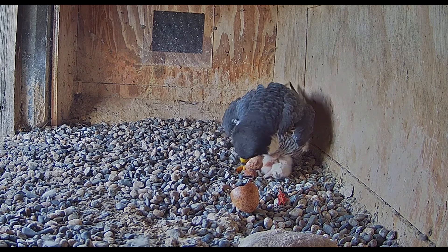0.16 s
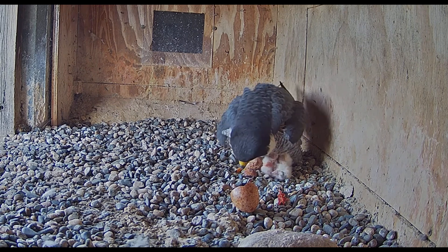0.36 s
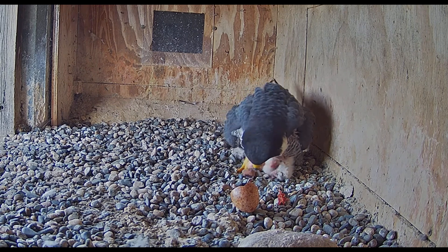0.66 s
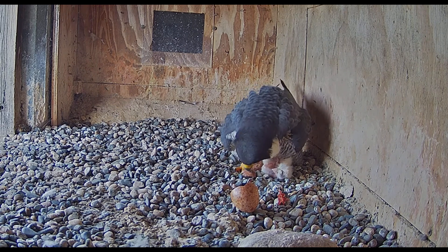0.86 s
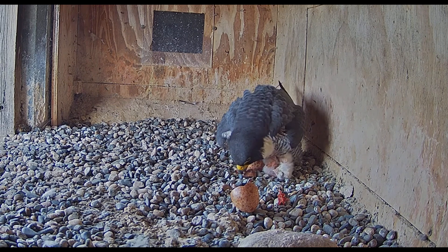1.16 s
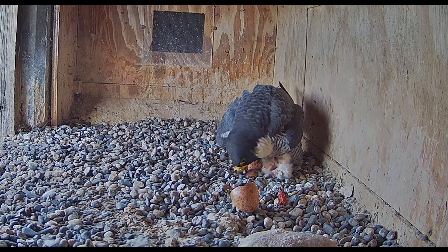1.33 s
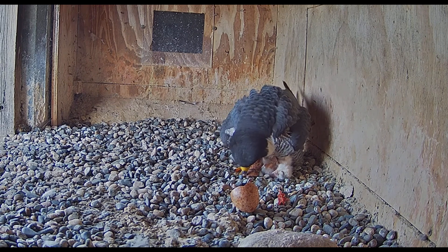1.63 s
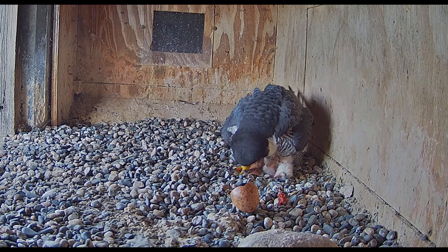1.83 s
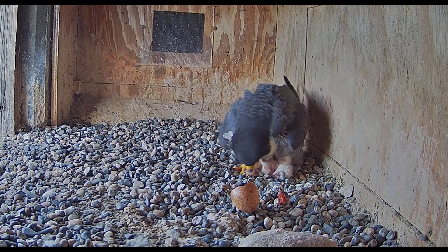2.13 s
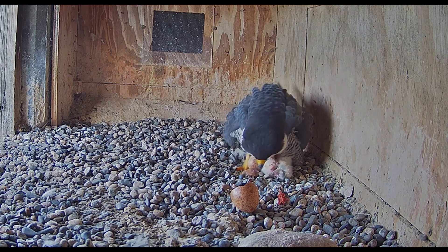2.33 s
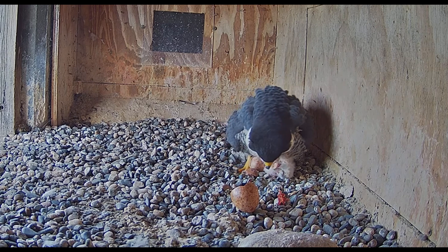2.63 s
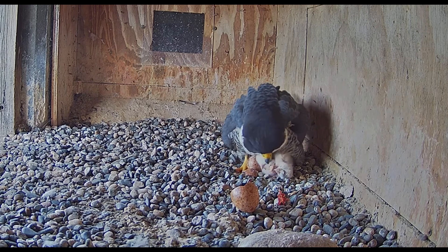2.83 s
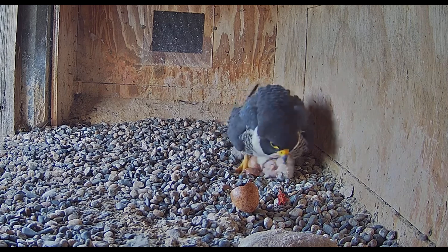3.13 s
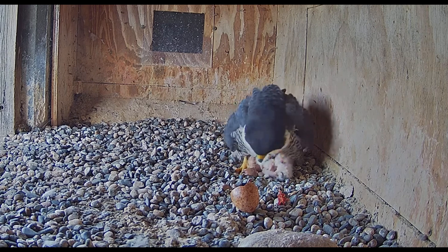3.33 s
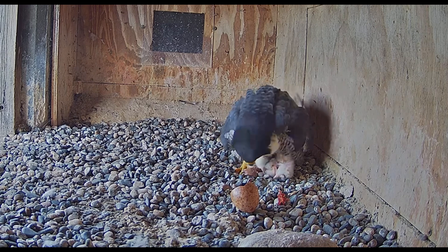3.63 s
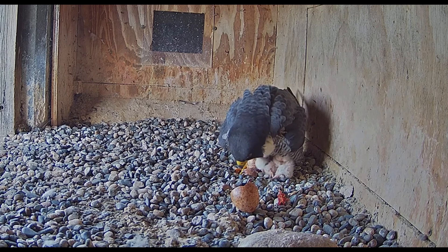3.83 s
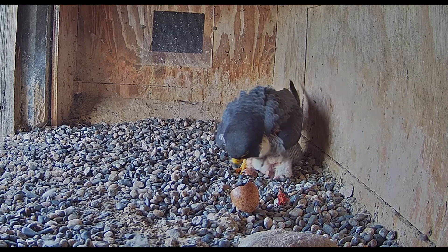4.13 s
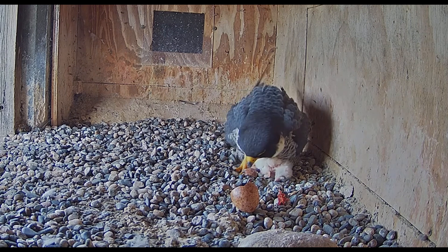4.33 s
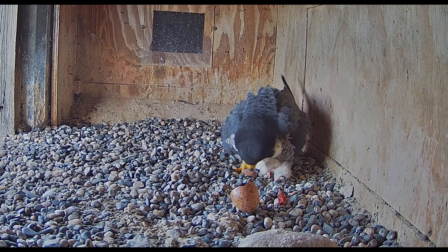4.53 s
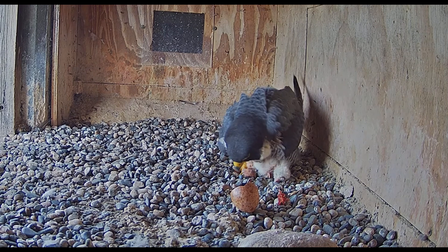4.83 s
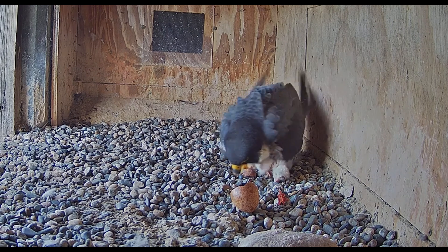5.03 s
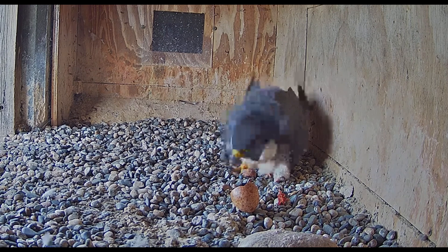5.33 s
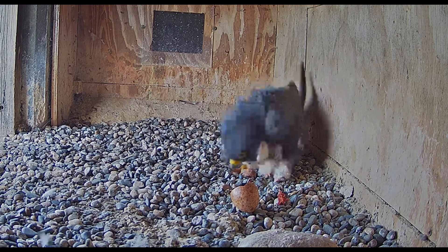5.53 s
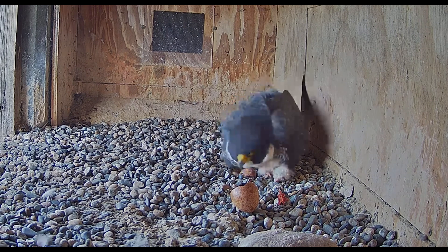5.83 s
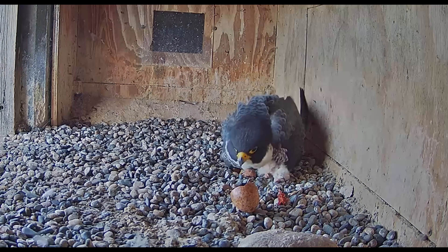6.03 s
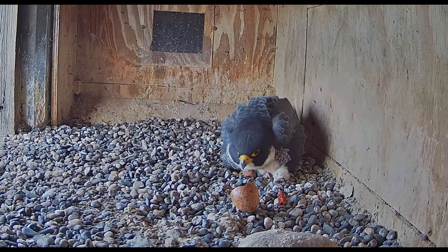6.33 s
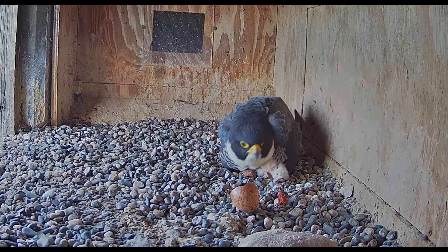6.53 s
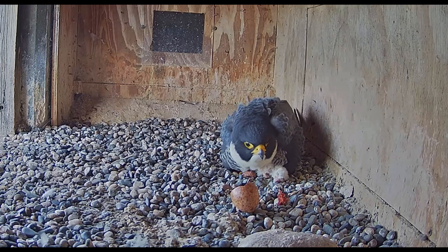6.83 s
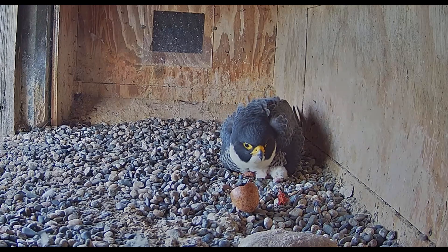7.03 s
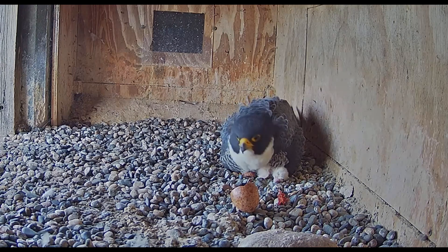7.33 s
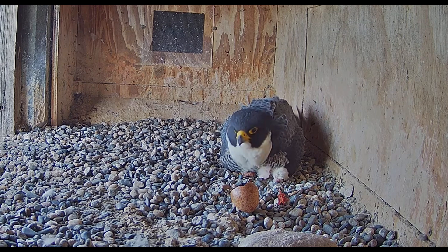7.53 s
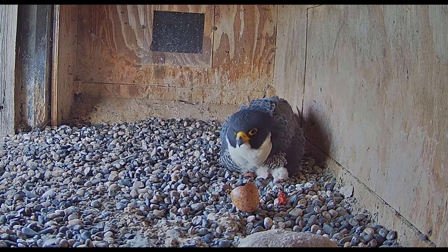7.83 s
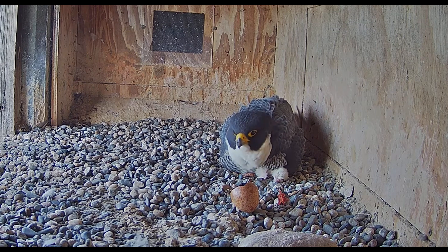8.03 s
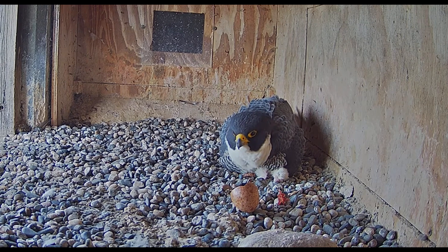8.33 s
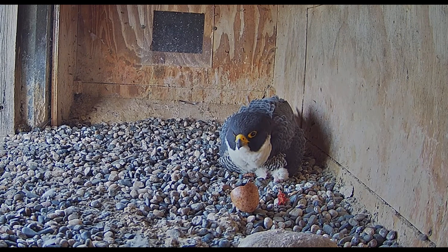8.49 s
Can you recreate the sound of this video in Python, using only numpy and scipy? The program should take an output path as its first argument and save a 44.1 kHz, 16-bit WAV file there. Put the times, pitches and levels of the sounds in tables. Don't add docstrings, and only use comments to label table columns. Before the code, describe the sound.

Quick piercing chick peeps repeat about twice a second, growing raspier, ringing slightly in a box above electrical hum, hiss and faint road noise.

```python
import sys
import numpy as np
from scipy import signal
from scipy.fft import rfft, irfft, next_fast_len
from scipy.io import wavfile
from scipy.ndimage import uniform_filter1d

SR = 44100
rng = np.random.default_rng(int(sys.argv[2]) if len(sys.argv) > 2 else 0)


def makeup_ratio(level_db):
    decades = np.asarray(level_db, float) / 20
    return 10 ** decades


def int16_out(signal):
    q = np.round(np.clip(np.atleast_2d(signal).T, -1, 1) * 32767)
    wavfile.write(sys.argv[1], SR, q.astype(np.int16))


N = 381906
LONG = next_fast_len(N + 2000)


def level(x, db):
    return x * makeup_ratio(db) / np.sqrt(np.mean(x ** 2))


def noise(size=LONG):
    return rng.standard_normal(size)


def gain_db(points, hz):
    f, db = np.transpose(points)
    return np.interp(np.log(hz + 1), np.log(f), db)


def colour(x, points):
    hz = np.fft.rfftfreq(len(x), 1 / SR)
    return irfft(rfft(x) * makeup_ratio(gain_db(points, hz)), len(x))


def ring(x, hz, width):
    off_centre = np.fft.rfftfreq(len(x), 1 / SR) - hz
    return irfft(rfft(x) / (1 + 2j * off_centre / width), len(x))


def noise_band(hz, width, size=LONG):
    return ring(ring(noise(size), hz, width), hz, width)


def walk(rate, size=LONG):
    k = max(int(SR / rate), 2)
    smooth = uniform_filter1d(uniform_filter1d(noise(size), k), k)
    return level(smooth, 0)


# t/s, length/s
PAUSES = [(.4306, .0022), (1.6866, .0022), (3.1256, .0022), (4.3556, .0022), (5.7946, .0022),
          (6.2563, .0035), (6.3121, .0037), (6.3681, .0037), (6.4240, .0039), (6.4801, .0037)]
SKIPS, SKIP_S = 5.903 + .0222 * np.arange(9), .004


def nest_time(s):
    s = np.asarray(s, float)
    held = sum(np.clip(s - a, 0, d) for a, d in PAUSES)
    skipped = sum(SKIP_S * (s >= a) for a in SKIPS)
    return s - held + skipped


def curve(s, values):
    return np.interp(np.arange(LONG) / SR, nest_time(s), values)


# f/Hz, level/dB per Hz
ENGINES = [(15, -50), (25, -12), (38, 2), (54, -1.5), (66, -12), (76, -8.5), (124, -5.5), (273, -20),
           (400, -21), (520, -36.5), (880, -120)]
# f/Hz, width/Hz, level/dB re engines
DRONES = [(66.1, 10.5, -1), (126.5, 4.1, -10), (178.5, 6.3, -11), (217, 15.5, -13.5)]
# t/s, level/dB
LORRIES = [(0, -48), (1.05, -48.5), (1.6, -54.5), (2.1, -53.5), (3.2, -50.5), (4.7, -52), (6.05, -52),
           (6.6, -56.5), (8.66, -57.5)]
# f/Hz, level/dB per Hz
TYRES = [(88, -22), (150, -3), (239, -7.5), (274, -7.5), (347, -8.5), (588, -9.5), (701, -13.5),
         (1010, -17), (1980, -29), (2680, -30), (3000, -46), (3900, -62), (6600, -120)]
# nearest t/s, level/dB, passing time/s
CARS = [
    (.06, -60, 0.095),
    (.5, -61.5, 0.48),
    (2.25, -63, 0.75),
    (3.1, -58, 0.34),
    (4.3, -59.5, 0.18),
    (4.93, -57, 0.21),
    (5.4, -61.5, 0.75),
    (6.05, -65, 0.27),
]


def traffic():
    engine_db, t = curve(*np.transpose(LORRIES)), np.arange(LONG) / SR
    rumble = level(colour(noise(), ENGINES), -2.03)
    drones = sum(level(ring(noise(), hz, width), db) for hz, width, db in DRONES)
    drones = drones * makeup_ratio(.9 * np.minimum(engine_db + 53, 0))

    roar = level(colour(noise(), TYRES), 1.0)
    power = makeup_ratio(2 * -64)
    for s, db, span in CARS:
        power = power + makeup_ratio(2 * db) / (1 + ((t - nest_time(s)) / span) ** 2) ** 2
    gusts = makeup_ratio(0.81 * walk(9.5))
    return (rumble + drones) * makeup_ratio(engine_db) + roar * np.sqrt(power) * gusts


# multiple of the mains f, level/dB
HUM = [(1, -46), (3, -78), (5, -70.5)]
# t/s, f/Hz
WHINE = [(0, 3400), (2.5, 3313), (5.6, 3367), (8.66, 3374)]
# f/Hz, level/dB
HISS = [(710, -22), (1200, -5), (3150, -3), (3430, -4), (3550, -4), (3860, -4), (7050, -9), (15100, -14),
        (15600, -10.5)]


def camera():
    mains_hz, mains_start, whine_db, hiss_db = 50.07, 2.8, -73.5, -66.5
    turn = 2 * np.pi * mains_hz * np.arange(LONG) / SR + mains_start
    hum = sum(level(np.cos(k * turn), db) for k, db in HUM) * makeup_ratio(0.39 * walk(4.9))

    whine_hz = curve(*np.transpose(WHINE)) + 14 * walk(50.5)
    fading = makeup_ratio(whine_db + 2.5 * walk(12))
    whine = np.sin(2 * np.pi * np.cumsum(whine_hz) / SR) * fading
    return hum + whine + level(colour(noise(), HISS), hiss_db)


# t/s, rise/s, fall/s, f/Hz, width/Hz, level/dB
STIRS = [
    (1.5, .01, .12, 3900, 1300, -68),
    (5.56, .016, .05, 6000, 3000, -75),
    (5, .15, .47, 540, 44, -65),
    (5.4, .18, 1, 580, 71, -65),
    (5.5, .088, .29, 880, 840, -68),
    (6.5, .05, .3, 2000, 120, -73),
    (7.0, .05, .18, 2000, 500, -71),
    (5.02, .13, .12, 900, 1100, -64),
]


def stirrings():
    t, out = np.arange(LONG) / SR, 0
    for s, rise, fall, hz, width, db in STIRS:
        late = t - nest_time(s)
        swell = np.where(late < 0, np.exp(-(late / rise) ** 2), np.exp(-np.abs(late) / fall))
        out = out + swell * level(noise_band(hz, width), db)
    return out


# f/Hz, width/Hz, t60/s, level/dB
BOX = [(1064, 230, 0.53, -8.5), (1980, 1100, .3, -20), (2900, 2200, 1, -4), (3842, 740, 1, -4),
       (4420, 1160, 0.99, -9.5), (5960, 3200, 0.86, -1.5), (8360, 2500, 0.36, -2)]
# delay t/s, level/dB
EARLY = [
    (.0024, -8),
    (.0057, -11),
    (.0108, -13),
    (.0205, -10),
]


def box(x):
    t = np.arange(SR) / SR
    tail = 0
    for hz, width, t60, db in BOX:
        tail = tail + level(noise_band(hz, width, SR), db) * 1000 ** (-t / t60)
    answer = makeup_ratio(-40) * tail * np.clip(t / .009, 0, 1)
    answer[0] += 1
    for s, db in EARLY:
        answer[int(s * SR)] += makeup_ratio(db)
    return signal.fftconvolve(x, answer)[:LONG]


# f/Hz, level/dB
THROAT = [(800, 14.5), (1300, 5.5), (1900, 3.5), (2400, -3), (3000, 3), (3900, -0.5), (4700, -0.5),
          (5800, -1), (6500, -16), (8500, -25), (12000, -39)]


def peep(s, *columns):
    t = np.arange(s[0], s[-1], 1 / SR)
    hz, db, bright_db, hoarse = (np.interp(t, s, c) for c in columns)
    hz = uniform_filter1d(hz, size=400, mode="nearest")
    hoarse = np.clip(hoarse + .06, 0, .85)
    rough, rasp, swell, drift, tremble = [walk(r, size=8192)[:len(t)] for r in (900, 1800, 150, 250, 700)]

    jitter = .11 * hoarse ** 2 * rough
    waver = .008 * drift
    phase = 2 * np.pi * np.cumsum(hz * (1 + waver + jitter)) / SR
    half_pitch = 0.42 * np.cos(phase / 2)
    flutter = np.sqrt(1 - hoarse ** 2) + hoarse * (rasp + half_pitch)

    orders = np.arange(1, 5)[:, None]
    shares = makeup_ratio(bright_db * (orders - 1))
    heard = shares * makeup_ratio(gain_db(THROAT, orders * hz))
    loud = np.sqrt(np.sum(heard ** 2, axis=0) / 2)
    edge = np.clip(np.minimum(t - s[0], s[-1] - t) / 0.0017, 0, 1)
    blur = 1 + .5 * np.sqrt(orders - 1) * tremble
    voice = np.sum(shares * blur * np.sin(orders * phase), axis=0) * flutter
    return int(s[0] * SR), voice * makeup_ratio(db + 1.13 * swell) * edge / loud


# level/dB, brightness/dB per overtone, share of effort heard as hoarseness
STAGES = [
    (-13.5, -9, 0.11),
    (-0.5, -5.5, .2),
    (-9.5, -2.5, 1),
    (-12, -6, 1),
    (-2, -0.5, 0.32),
    (3.5, -4.5, 0.091),
    (-3, -3, 0.087),
]
# level/dB, and brightness/dB per overtone
FORCED_DB, FORCED_BRIGHT_DB = [9, 17], [1, 11]
BREAK_SHARES, FLARE_S = [0.393, .78], 0.005
RISE_HZ_PER_S, DROP_HZ, END_S, END_HZ = 34000, 2050, .023, 1540
GAPE_DB, GAPE_FADES_S = 6, 1.8


def in_break(pair):
    return np.r_[0, 0, pair, 0, 0, 0]


def stages(row, kind, least_hoarse):
    top, fall, top_hz, db, effort = row
    start_hz, bend, top_db, end_db = kind
    rise = (top_hz - start_hz) / RISE_HZ_PER_S
    share = np.sort(np.r_[np.linspace(0, 1, num=9), BREAK_SHARES])
    s = np.r_[-rise, fall * share, fall + FLARE_S, fall + END_S]
    sag_hz = top_hz - (top_hz - DROP_HZ) * share ** bend
    flare_hz = DROP_HZ - (DROP_HZ - END_HZ) * FLARE_S / END_S
    hz = np.r_[start_hz, sag_hz, flare_hz, END_HZ]

    at = np.r_[-rise, 0, fall * np.array(BREAK_SHARES), fall, fall + FLARE_S, fall + END_S]
    loud_db, bright_db, hoarse = np.transpose(STAGES)
    loud_db = db + loud_db + effort * in_break(FORCED_DB) + np.r_[top_db * in_break([0, 0]), 0][:0].sum()
    loud_db = loud_db + np.r_[0, top_db, 0, 0, 0, 0, end_db]
    hoarse = np.maximum(effort * hoarse, in_break([least_hoarse] * 2))
    gape_db = GAPE_DB * np.exp(-top / GAPE_FADES_S) * (at >= fall)
    bright_db = bright_db + effort * in_break(FORCED_BRIGHT_DB) + gape_db
    return (nest_time(top) + s, hz, *(np.interp(s, at, c) for c in (loud_db, bright_db, hoarse)))


# top of arch t/s, fall/s, top f/Hz, level/dB, effort 0-1
ARCHED = [
    (.204, .046, 2876, -52.5, 0.14),
    (.600, 0.062, 3330, -53.5, .6),
    (1.692, 0.051, 2900, -53.5, 0.03),
    (2.150, 0.053, 2900, -53.5, 0.34),
    (3.900, 0.06, 3010, -51.5, 0.28),
    (4.310, .060, 2830, -54.5, 0.43),
]
HELD_TOP = [
    (1.146, 0.058, 3060, -54.5, 0.3),
    (2.561, 0.07, 3128, -53, 0.37),
    (8.190, 0.064, 3125, -52.5, 0.46),
]
SLIDING = [
    (3.028, .078, 3655, -50.5, 0.78),
    (3.414, .072, 3350, -53.5, 0.53),
    (5.110, .058, 3010, -52, 0.17),
    (6.262, .068, 3600, -54, 0.51),
]
RASPED = [
    (5.792, 0.071, 3520, -50.5, 0.27),
    (6.702, 0.089, 3545, -56, 0.73),
    (7.239, .091, 3685, -53.5, .85),
    (7.654, .094, 3660, -53, 0.97),
]
# start f/Hz, bend (pitch sags as share of fall ** bend), top level/dB, end level/dB
KINDS = [
    (1868, 1.45, -2.5, -10),
    (2078, 3.8, -4.5, -8.5),
    (2747, .95, -3, -12),
    (2780, 2.05, -3, -21),
]
LEAST_HOARSE = [.45, .52, .05, .55]
# t/s, f/Hz, level/dB
WHIMPER = [
    (6.914, 1626, -60),
    (6.94, 1820, -69),
    (7.0, 2320, -72),
    (7.06, 2340, -73),
]


def chick():
    calls = []
    for rows, kind, least in zip((ARCHED, HELD_TOP, SLIDING, RASPED), KINDS, LEAST_HOARSE):
        calls += [stages(row, kind, least) for row in rows]
    s, hz, db = np.transpose(WHIMPER)
    calls.append((nest_time(s), hz, db, np.full(len(s), -8.0), np.full(len(s), .3)))

    out = np.zeros(LONG)
    for call in calls:
        start, voice = peep(*call)
        out[start:start + len(voice)] += voice
    return colour(out, THROAT)


def stream(nest):
    s = np.arange(N) / SR
    playing = 1 - sum((s >= a) & (s < a + d) for a, d in PAUSES)
    splice_s = .00012
    fade = np.linspace(-splice_s, splice_s, num=9)
    takes = [nest[np.round((nest_time(s + d) - d) * SR).astype(int)] for d in fade]
    return np.mean(takes, axis=0) * playing


# f/Hz, level/dB
LOW_CUT = [(20, -16), (30, -6), (42, 0), (20000, 0)]


def scene():
    background = colour(traffic(), LOW_CUT) + camera() + stirrings()
    nest = background + box(makeup_ratio(-3.0) * chick())
    return stream(nest)[None]


def top_cut(x):
    return signal.sosfilt(signal.butter(12, 15740, fs=SR, output="sos"), x)


def record(dry):
    return top_cut(dry)


dry = scene()
out = record(dry)
int16_out(out)
```